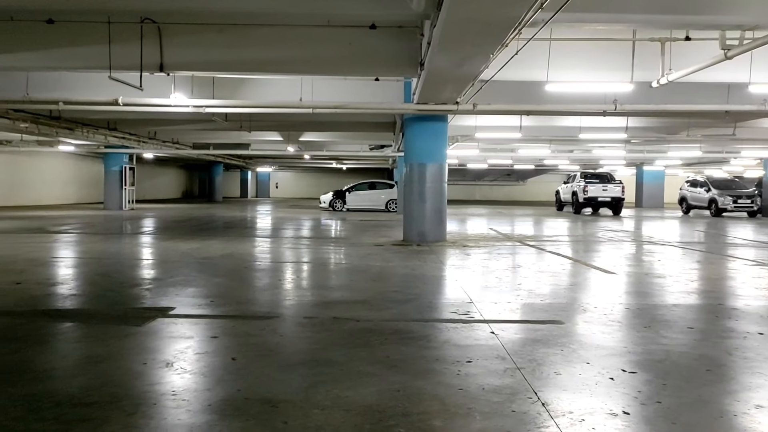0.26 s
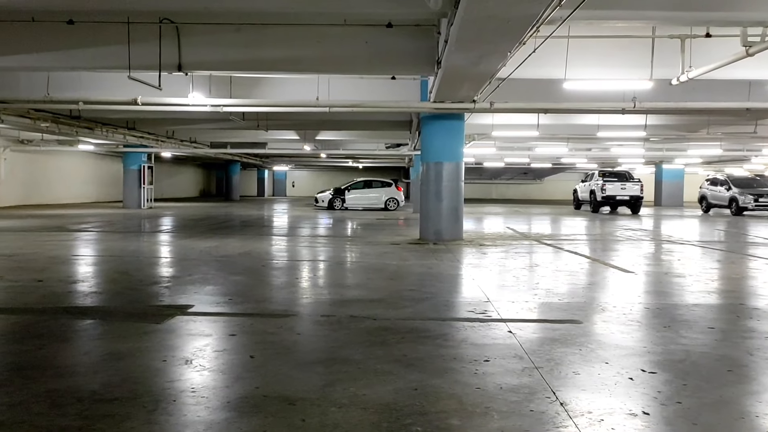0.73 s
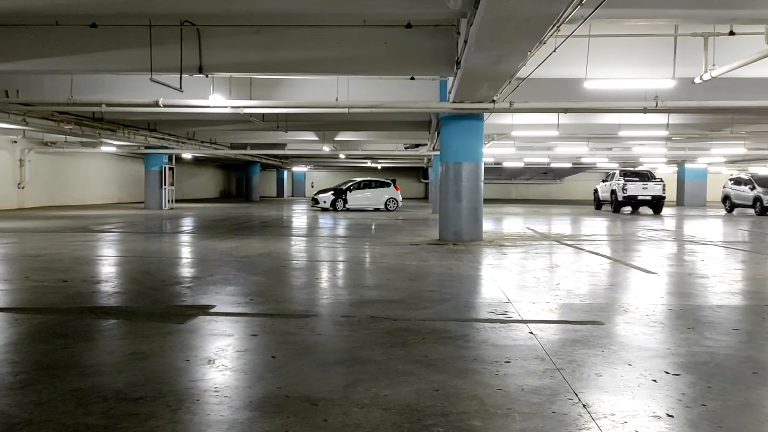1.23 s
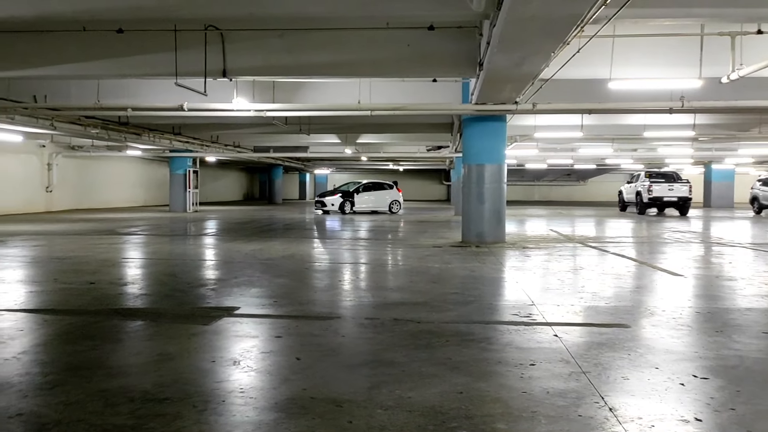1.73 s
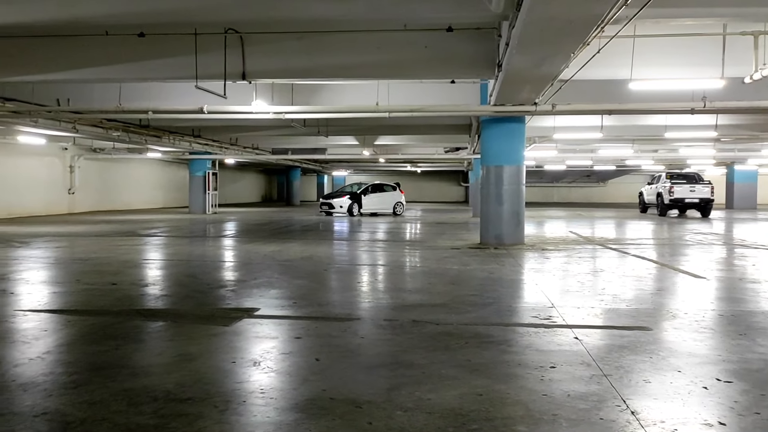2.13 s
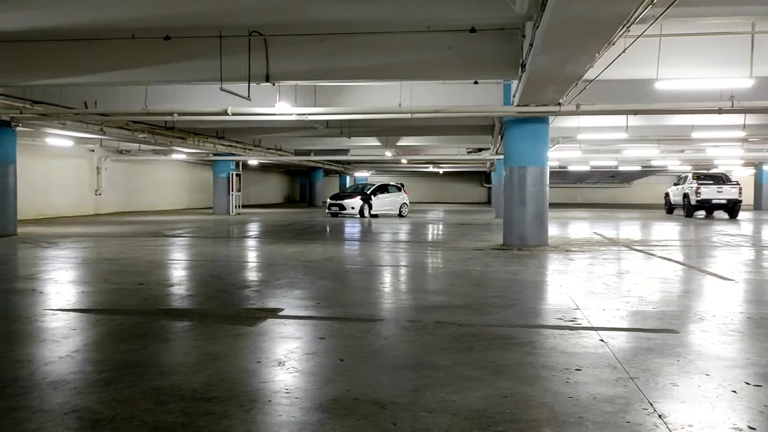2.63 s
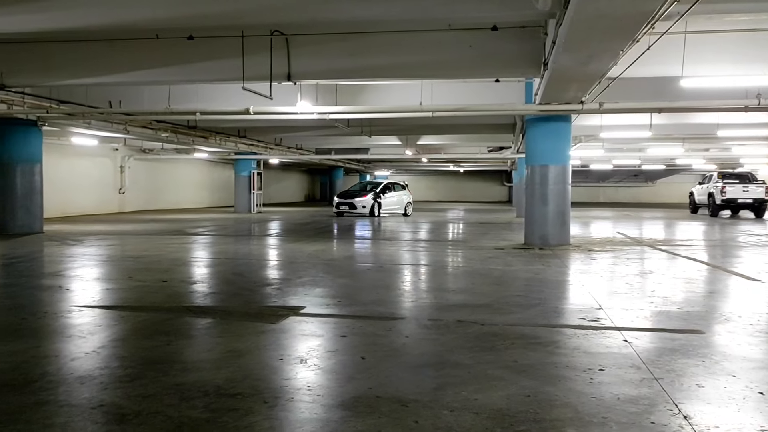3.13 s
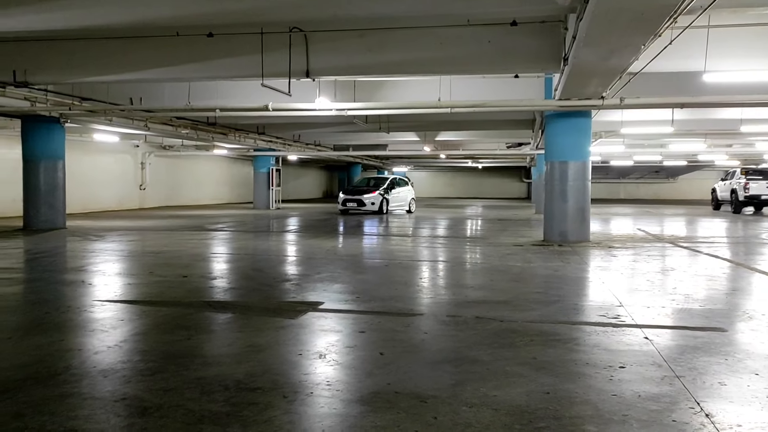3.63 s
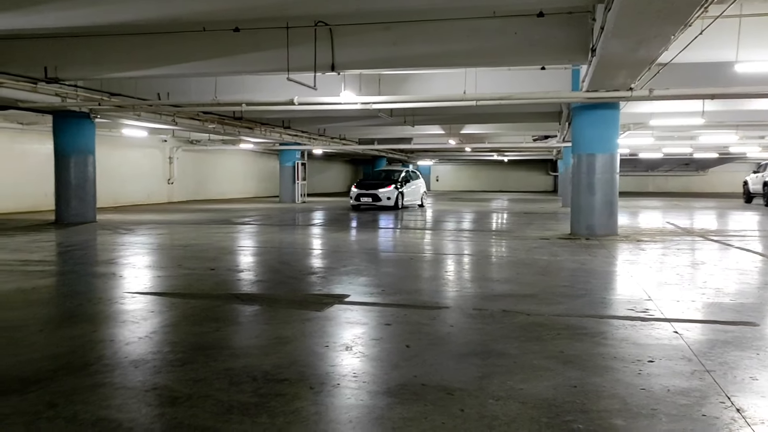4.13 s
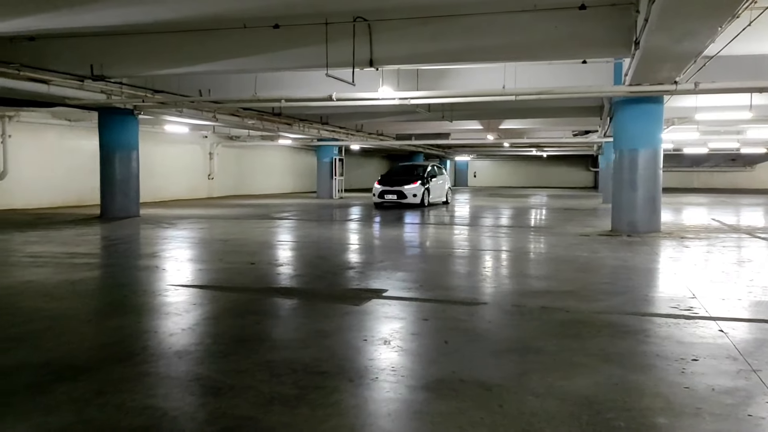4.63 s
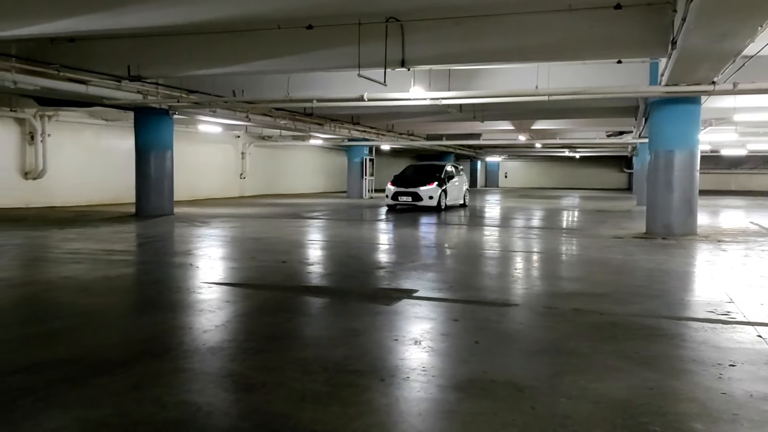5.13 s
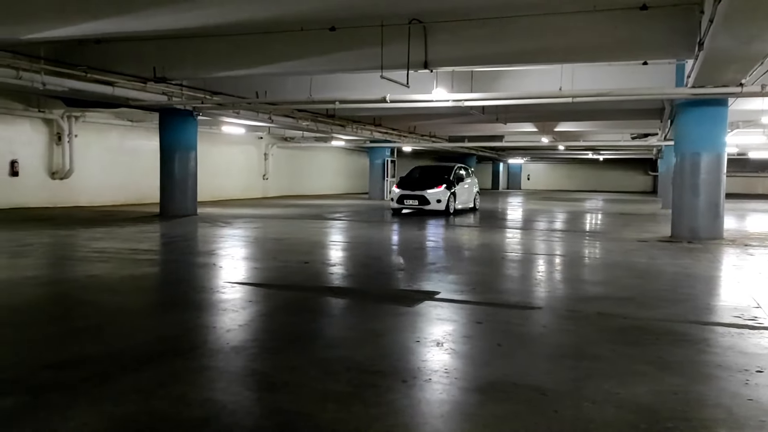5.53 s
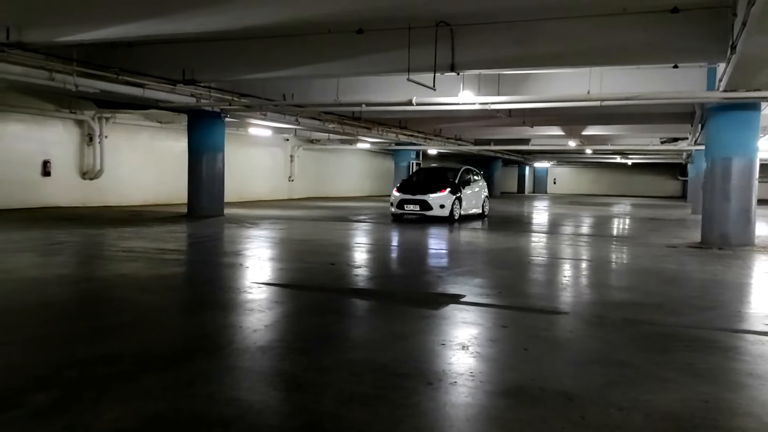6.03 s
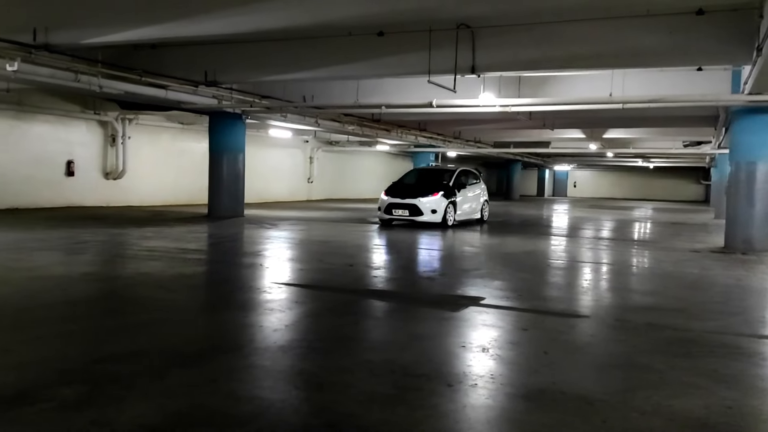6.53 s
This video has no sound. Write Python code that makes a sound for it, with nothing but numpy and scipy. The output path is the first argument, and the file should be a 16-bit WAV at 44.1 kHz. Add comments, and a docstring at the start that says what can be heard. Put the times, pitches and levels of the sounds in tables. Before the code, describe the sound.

A small four-cylinder car moves through a large, low concrete car park, heard from a distance in stereo with diffuse reverberation. From 0 to 2 seconds its engine is a low, smooth drone, rising a little at first and then holding, with booming bass near 85 hertz, uneven exhaust rumble, a brief faint hum and quiet, steady hall air. Around 2.4 seconds the car turns its front to the microphones: a soft, airy engine hiss swells, peaks near 3 seconds and settles slightly higher than before. From about 3.5 seconds the revs climb steadily; roar and rumble thicken. Between 4.5 and 6 seconds deep booms near 155 hertz pulse in and out, with a very faint gear whine. From 6 seconds the low firing throb and rough growl are strongest, and the engine is still running and rising at 6.8 seconds.

```python
"""Small car in a low concrete car park

A four-cylinder car rolls through the hall, turns towards two spaced microphone ports and speeds up.
Its firing orders, sines at multiples of a rising rate, pass through booms that stay near fixed pitches.
Rumble, roar, growl and engine bay hiss are shaped noise; the hiss swells once the bay faces the ports.
A faint gear whine follows the revs, and the air of the hall sounds steadily as diffuse noise."""
import sys
import numpy as np
from scipy import signal
from scipy.fft import rfft, irfft, next_fast_len
from scipy.io import wavfile

SR = 44100
rng = np.random.default_rng(int(sys.argv[2]) if len(sys.argv) > 2 else 0)


def transcribe(u):
    """Save the signal u as a 16-bit wav file named by the first command-line argument.

    u: samples, shape (n,) or (channels, n), limited to [-1, 1]; the rate is SR.
    q: integer samples, one column per channel.
    """
    v = np.clip(np.atleast_2d(u).T, -1, 1)
    q = np.round(v * 32767).astype(np.int16)
    wavfile.write(sys.argv[1], SR, q)


N = 298998
TIME_S = np.arange(N) / SR
GRID = next_fast_len(N + 8192)  # transform length [samples]
HZ = np.maximum(np.arange(GRID // 2 + 1) * SR / GRID, 1)

# Engine speed: (time [s], firing rate [1/s])
FIRING_RATE = [(0, 38.6), (.8, 42.5), (1.5, 43.5), (2.2, 41.9), (2.7, 43.9), (3.5, 45), (4.2, 47.6),
               (4.7, 49), (5.0, 50.3), (5.6, 53.1), (6.25, 56.1), (6.78, 57.6)]
# Firing tone, throbbing as echoes meet it: (time [s], level [dB])
FIRING_LEVEL = [(0, -50), (2, -49.5), (4, -43), (4.3, -35), (4.6, -38), (4.8, -51.5), (5.02, -30.5),
                (5.2, -41.5), (5.45, -30), (5.6, -40.5), (5.8, -29.5), (5.95, -36.5), (6.2, -22.5),
                (6.45, -28), (6.7, -23.5), (6.78, -26)]
# Third order: (time [s], level [dB])
THIRD_LEVEL = [(0, -38), (.8, -29), (1.5, -38.5), (2.2, -47), (2.7, -27), (3.5, -32), (4.2, -33), (5, -34),
               (5.8, -36), (6.3, -29.5), (6.78, -24)]
# Fourth order: (time [s], pitch [Hz], level [dB])
FOURTH_ORDER = [(0, 162, -35.5), (.5, 159.7, -30.5), (.9, 167.6, -24), (1.3, 170, -30.5),
                (1.75, 171.6, -30), (2.15, 169.8, -35.5), (2.5, 171.9, -25.5), (2.9, 175.2, -29),
                (3.4, 178.6, -31), (3.8, 183.7, -30), (4.07, 187, -25), (4.2, 185.9, -31.5),
                (4.33, 184.1, -20), (4.55, 191.2, -33), (4.9, 200.4, -43), (5.4, 209.4, -33),
                (5.8, 225.3, -28), (6.3, 226.1, -34.5), (6.78, 232.4, -29.5)]
# Fifth order, rough and pulled low by echoes as the revs climb: (time [s], pitch [Hz], level [dB])
FIFTH_ORDER = [(0, 195, -32.5), (.8, 207.6, -37), (1.4, 214.5, -28), (2.1, 209.8, -38), (2.7, 216.3, -24.5),
               (3.3, 227.4, -28), (3.6, 224.5, -53), (3.95, 232, -24), (4.25, 235.6, -26),
               (4.5, 238.2, -24.5), (4.9, 247.4, -25), (5.15, 249.5, -27.5), (5.38, 254.2, -23),
               (5.55, 260, -37.5), (6.0, 270.6, -38.5), (6.78, 285.3, -42.5)]
# Other orders ahead of the silencer: (multiple of firing rate [1], relative level [dB])
OTHER_ORDERS = [(.5, -12.5), (2, -11), (2.5, -14.5), (3.5, -13), (4.5, -7), (5.5, -10.5), (6, -3.5),
                (7, -12.5), (8, -10)]
# Silencer response, best below 260 Hz: (frequency [Hz], gain [dB])
SILENCER_GAIN = [(20, -11.5), (100, 7.5), (130, 8), (255, -0.5), (280, -1.5), (345, -12.5), (400, -11),
                 (520, -17.5)]
OTHER_ORDERS_DB = -30  # all of them together

# Booms that stay near their pitch while the revs rise: (time [s], pitch [Hz], level [dB])
LOW_BOOM_TRACK = [(0, 79.2, -36.5), (.17, 85.9, -20), (.4, 86.8, -29.5), (.52, 83.2, -29),
                  (.65, 80.7, -28.5), (.83, 84.25, -25), (1.0, 86.1, -32.5), (1.09, 84.1, -32),
                  (1.22, 83, -24.5), (1.35, 82.24, -31), (1.55, 83.46, -28), (1.95, 82.86, -24),
                  (2.25, 83.5, -20.5), (2.6, 84.4, -19), (2.8, 83.8, -28), (2.95, 84, -32.5),
                  (3.2, 88.53, -28.5), (3.6, 86.1, -26.5), (3.8, 83.1, -30), (4.1, 83.9, -32),
                  (4.25, 85.46, -40), (4.65, 83.2, -20), (4.78, 85, -32), (4.9, 87.97, -46),
                  (5.12, 88.73, -28), (5.6, 87.9, -42), (6.4, 85.04, -33), (6.78, 83.4, -29.5)]
HIGH_BOOM_TRACK = [(3.5, 152, -55), (3.75, 153.1, -40), (3.97, 151.8, -24.5), (4.2, 152, -34),
                   (4.4, 153, -29.5), (4.63, 157, -20.5), (4.85, 153.4, -28), (4.97, 152.3, -19),
                   (5.2, 153.8, -26.5), (5.35, 152.1, -16.5), (5.5, 158.3, -24), (5.58, 159.3, -14.5),
                   (5.68, 157.5, -27.5), (5.82, 150.6, -19.5), (5.95, 154, -28.5), (6.2, 152.8, -19),
                   (6.33, 152.4, -28), (6.57, 153.9, -20), (6.78, 157.4, -19.5)]
# Weaker boom of constant pitch between them: (time [s], level [dB])
MIDDLE_BOOM_LEVEL = [(0, -45), (1.6, -39), (2.3, -53), (3, -40), (3.55, -42), (3.85, -27.5), (4.1, -33.5),
                     (4.6, -47), (4.851, -32), (5.3, -46), (5.8, -36), (6.78, -38)]
MIDDLE_BOOM_HZ = 126.4
# Echoes that wander about the low boom's pitch
FLUTTER_PITCH_HZ, FLUTTER_DB, FLUTTER_WAVER_HZ = 85.43, -37, 16
# A brief hum early on and a late one: (time [s], pitch [Hz], level [dB])
EARLY_HUM_TRACK = [(.15, 318, -55), (.35, 317, -38.5), (.7, 322, -41), (1.1, 316, -43), (1.4, 316, -61.5)]
LATE_HUM_TRACK = [(4.4, 190, -63), (4.7, 190, -27.5), (5.2, 188, -39.5), (5.8, 184, -40), (6.15, 181, -28),
                  (6.5, 183, -30), (6.78, 185, -27.5)]
# Dull throb under the low boom: (time [s], level [dB])
THROB_LEVEL = [(0, -41.5), (1.0, -43), (1.5, -45), (2.0, -46.5), (2.7, -38), (3.2, -47), (3.8, -47),
               (5.1, -43.5), (5.4, -38), (5.8, -40), (6.2, -44), (6.78, -40)]
# Its noise spectrum: (frequency [Hz], relative density [dB per Hz])
THROB_SPECTRUM = [(55, -28), (64, 5.5), (72, 7.5), (78, 0), (88, -35)]

# Gear whine: (time [s], multiple of firing rate [1], level [dB])
WHINE_TRACK = [(4.0, 25.2, -80), (4.3, 25.1, -64), (4.55, 25.2, -63), (4.7, 25.2, -53), (4.8, 25.2, -59),
               (4.93, 25.3, -52), (5.07, 25.1, -52), (5.17, 25, -62), (5.4, 25, -57), (5.52, 24.9, -51),
               (5.66, 25.2, -58), (5.8, 25.3, -55.5), (5.97, 25, -55), (6.07, 25.2, -57),
               (6.22, 25.4, -52.5), (6.35, 25.1, -56), (6.5, 25.0, -55.5), (6.78, 25, -55)]
# A far wall returns the whine late, so a little lower: (delay [s], gain [dB])
WHINE_ECHOES = [(0.17, -12), (0.34, -16)]

# Growl near 460 Hz: (time [s], level [dB])
GROWL_LEVEL = [(0, -71.5), (2.8, -63.5), (3.3, -48.5), (4.1, -50), (4.35, -46), (4.8, -44.5), (5.1, -49),
               (5.6, -48), (5.95, -47.5), (6.15, -39.5), (6.45, -40.5), (6.6, -45.5), (6.78, -43)]
# Body resonance behind the growl: (frequency [Hz], relative density [dB per Hz])
GROWL_SPECTRUM = [(415, -30), (438, -4), (455, 0), (480, 0), (500, -9), (550, -10), (620, -17), (680, -30)]
# Exhaust rumble, growing unevenly as the car nears: (time [s], level [dB])
EXHAUST_LEVEL = [(0, -30), (.9, -25.5), (2.2, -26), (2.7, -24.5), (3.0, -25), (3.3, -23), (4, -21),
                 (4.4, -24.5), (5.3, -23.5), (5.8, -22), (6.78, -21.5)]
# Its spectrum, where the low hall favours some pitches: (frequency [Hz], relative density [dB per Hz])
EXHAUST_SPECTRUM = [(12, -37), (28, -14), (38, -33.5), (55, -12.5), (62, -14.5), (70, -24.5), (80, -21.5),
                    (92, -8), (106, -13), (125, -1), (140, -3), (180, 2), (200, -2.5), (225, -0.5),
                    (255, -3), (275, -11.5), (295, -13.5), (318, -8), (342, -14), (355, -18.5),
                    (410, -21.5), (430, -40), (600, -63)]
# Tyre and intake roar: (time [s], level [dB])
TYRE_INTAKE_LEVEL = [(0, -45), (.4, -43), (2.4, -42.5), (2.9, -41.5), (3.3, -39.5), (4, -39.5), (4.6, -40),
                     (5.7, -39.5), (6.3, -38.5), (6.78, -38)]
# Its spectrum: (frequency [Hz], relative density [dB per Hz])
TYRE_INTAKE_SPECTRUM = [(180, -31.5), (300, -7), (400, -10.5), (425, -11), (500, -12.5), (741, -17.5),
                        (1310, -21), (1850, -25), (2500, -35), (3250, -74.5)]

# The nose swings towards the microphones, overshoots and settles
TURN_S, TURN_LASTS_S, SETTLE_S = 2.445, 0.24, 0.86
# Engine bay hiss: (frequency [Hz], relative density [dB per Hz])
BAY_SPECTRUM = [(800, -26.5), (1100, -4), (1300, 2), (1450, -1), (1650, -13.5), (2200, -5.5), (2700, -3.5),
                (3100, -7), (3620, -8.5), (5710, -11), (7310, -7), (8860, -13), (9500, -12.5),
                (12400, -51.5)]
# Level at the start, growth as the car nears, and full gains for an open and for a squarely facing bay
BAY_START_DB, BAY_RISE_DB_PER_S, BAY_OPEN_DB, BAY_FACING_DB = -53, 0.09, 3.0, 6.5
BAY_FLICKER_DB, BAY_FLICKER_HZ = 0.53, 26.0
# Sheen above the hiss: (frequency [Hz], relative density [dB per Hz])
SHEEN_SPECTRUM = [(9000, -37), (9700, 6.5), (10300, 1.5), (12000, -1), (13000, -3), (15000, -9),
                  (16000, -15.5)]
SHEEN_START_DB, SHEEN_RISE_DB_PER_S, SHEEN_OPEN_DB = -90, 2, 1.5
HISS_EDGE_HZ = 10056

# Steady air of the hall: (frequency [Hz], relative density [dB per Hz])
HALL_SPECTRUM = [(180, -33), (300, -7.5), (327, -3), (347, -10.5), (424, -21), (456, -16.5), (746, -17.5),
                 (913, -14.5), (4350, -34), (7320, -49), (9500, -56), (12400, -74.5), (20900, -120)]
HALL_DB = -46
# Likeness of diffuse noise at the two ports: (frequency [Hz], left-right correlation [1])
PORT_LIKENESS = [(60, 1), (120, 1), (250, 0.87), (520, 0.58), (700, 0.54), (1000, -0.086), (1400, -0.25),
                 (2200, 0.21), (4510, -0.093), (9270, 0.047)]
PORTS_UNLIKE_HZ = 520  # echoes of tones this high reach the ports unrelated
# Colour of the microphone ports: (frequency [Hz], left minus right [dB])
PORT_DIFFERENCE = [(60, 5.5), (180, 6.5), (320, 7), (560, 2.5), (1000, 3.5), (3000, 2.5), (4500, 1),
                   (5800, -1.5), (6900, -6), (7600, -6.5), (8300, 6), (9300, 6.5), (10500, 0.5),
                   (14000, -2.5)]
BASS_LAG_S, MOST_LAG_RAD = 0.00009, 0.2  # delay of the left port and its phase limit
CUTOFF_HZ = 15200


def from_db(db):
    """Decibels are twenty times the decimal logarithm of the amplitude gain."""
    return 10 ** (np.asarray(db) / 20)


def rms_one(x):
    """Division by the root mean square gives unit effective amplitude."""
    return x / np.sqrt(np.mean(x ** 2) + 1e-20)


def in_time(rows):
    """Linear interpolation turns each column into a curve over all samples; end values are held."""
    s, *columns = np.transpose(rows)
    return [np.interp(TIME_S, s, column) for column in columns]


def at_hz(points):
    """Linear interpolation over the logarithm of frequency fills the frequency grid."""
    hz, value = np.transpose(points)
    return np.interp(np.log(HZ), np.log(hz), value)


def drift(rate_hz):
    """Low-pass filtering of white noise by a double pole leaves a slow random curve of rms 1."""
    step = 40  # samples between the drawn values
    pole = np.exp(-2 * np.pi * rate_hz * step / SR)
    white = rng.standard_normal(N // step + 3002)
    slow = signal.lfilter([1], [1, -2 * pole, pole * pole], white)[3000:]  # the filter has settled
    return np.interp(np.arange(N) / step, np.arange(len(slow)), rms_one(slow))


def tone(hz, steady, waver_hz):
    """Direct sound is a steady sine; echoes add random quadrature parts, partly apart at the ports."""
    phase = 2 * np.pi * (np.cumsum(hz) / SR + rng.random())
    cosine, sine = np.cos(phase), np.sin(phase)
    mid = (steady + drift(waver_hz)) * cosine + drift(waver_hz) * sine
    side = drift(waver_hz) * cosine + drift(waver_hz) * sine
    unlike = min(np.mean(hz) / PORTS_UNLIKE_HZ, 1) ** 2
    return rms_one(mid) + unlike * rms_one(side) * [[1], [-1]]


def tracked_tone(rows, steady=8.0, waver_hz=6.0):
    """Modulation: a wavering tone follows tabulated pitch and level."""
    hz, db = in_time(rows)
    return from_db(db) * tone(hz, steady, waver_hz)


def hall_noise(spectrum):
    """A diffuse field is alike at both ports in the bass, almost unrelated in the treble; mid rms 1."""
    mid, side = rfft(rng.standard_normal((2, GRID))) * from_db(at_hz(spectrum))
    alike = np.clip(at_hz(PORT_LIKENESS), -1, 1)
    common = np.sqrt(1 + alike) * mid
    opposed = np.sqrt(1 - alike) * side
    pair = irfft([common + opposed, common - opposed], GRID)[:, :N]
    return pair / np.sqrt(np.mean(pair.mean(axis=0) ** 2))


def levelled_noise(level, spectrum):
    """Modulation: diffuse noise follows a tabulated level."""
    return from_db(in_time(level)[0]) * hall_noise(spectrum)


def engine():
    """Periodic firing radiates whole and half orders; hall echoes make each fade in and out."""
    firing_hz = in_time(FIRING_RATE)[0]
    silencer_hz, silencer_db = np.transpose(SILENCER_GAIN)
    others = 0
    for multiple, db in OTHER_ORDERS:
        order_hz = multiple * firing_hz
        passed_db = db + np.interp(order_hz, silencer_hz, silencer_db)
        others = others + from_db(passed_db) * tone(order_hz, 1.0, 3.0)
    firing = from_db(in_time(FIRING_LEVEL)[0]) * tone(firing_hz, 4.5, 5.0)
    third = from_db(in_time(THIRD_LEVEL)[0]) * tone(3 * firing_hz, 2.0, 4.0)
    fourth = tracked_tone(FOURTH_ORDER, 3.0, 8.3)
    fifth = tracked_tone(FIFTH_ORDER, 2.2, 8.0)
    return firing + third + fourth + fifth + from_db(OTHER_ORDERS_DB) * rms_one(others)


def booms():
    """Resonance holds these tones near their own pitch while the revs rise."""
    middle = tracked_tone([(s, MIDDLE_BOOM_HZ, db) for s, db in MIDDLE_BOOM_LEVEL])
    # no steady part: only wandering echoes
    flutter = from_db(FLUTTER_DB) * tone(np.full(N, FLUTTER_PITCH_HZ), 0, FLUTTER_WAVER_HZ)
    return tracked_tone(LOW_BOOM_TRACK) + tracked_tone(HIGH_BOOM_TRACK) + middle + flutter


def hums():
    """Narrow-band modulation: two passing hums waver in pitch and level."""
    return tracked_tone(EARLY_HUM_TRACK, 1.3, 11.0) + tracked_tone(LATE_HUM_TRACK, 2.0, 6.0)


def gear_whine():
    """A high multiple of the firing rate gives a weak thread of tone, blurred by delayed echoes."""
    multiple, db = in_time(WHINE_TRACK)
    direct = from_db(db) * tone(multiple * in_time(FIRING_RATE)[0], 1.2, 24.0)
    heard = direct
    for delay_s, echo_db in WHINE_ECHOES:
        late = np.pad(direct, [(0, 0), (int(delay_s * SR), 0)])[:, :N]
        heard = heard + from_db(echo_db) * late
    return heard


def throb():
    """Band-limited noise fluctuates slowly, a dull throb under the low boom."""
    return levelled_noise(THROB_LEVEL, THROB_SPECTRUM)


def growl():
    """A body resonance narrows noise; it is strong as the tenth and then the eighth order cross it."""
    return levelled_noise(GROWL_LEVEL, GROWL_SPECTRUM)


def exhaust_rumble():
    """Reverberation spreads the exhaust noise and favours some low pitches."""
    return levelled_noise(EXHAUST_LEVEL, EXHAUST_SPECTRUM)


def tyre_and_intake_roar():
    """Broadband tyre and intake noise is spread by the concrete."""
    return levelled_noise(TYRE_INTAKE_LEVEL, TYRE_INTAKE_SPECTRUM)


def nose():
    """Directivity in time: the bay's opening (0-1), and the passing moment when it faces squarely."""
    since = np.maximum(TIME_S - TURN_S, 0)
    opened = 1 - np.exp(-since / TURN_LASTS_S)
    return opened, opened * np.exp(-(since / SETTLE_S) ** 2)


def engine_bay_hiss():
    """Directivity raises the hiss as the bay turns to the ports; its level flickers slightly."""
    opened, facing = nose()
    db = BAY_START_DB + BAY_RISE_DB_PER_S * TIME_S + BAY_OPEN_DB * opened + BAY_FACING_DB * facing
    return from_db(db + BAY_FLICKER_DB * drift(BAY_FLICKER_HZ)) * hall_noise(BAY_SPECTRUM)


def airy_top():
    """Approach and directivity raise a very faint treble noise above the hiss."""
    db = SHEEN_START_DB + SHEEN_OPEN_DB * nose()[0] + SHEEN_RISE_DB_PER_S * TIME_S
    return from_db(db) * hall_noise(SHEEN_SPECTRUM)


def hall_air():
    """Stationary diffuse noise: the steady air of the hall."""
    return from_db(HALL_DB) * hall_noise(HALL_SPECTRUM)


def scene():
    """Superposition of tones and diffuse noise; all but the sheen falls away steeply near 10 kHz."""
    tones = engine() + booms() + hums() + gear_whine()
    car_noise = throb() + growl() + exhaust_rumble() + tyre_and_intake_roar() + engine_bay_hiss()
    edge = signal.cheby2(10, 40, HISS_EDGE_HZ, fs=SR, output="sos")
    return signal.sosfilt(edge, tones + car_noise + hall_air()) + airy_top()


def record(dry):
    """Spaced ports differ in colour and phase: the left hears the bass a little late; the top is cut."""
    tilt = at_hz(PORT_DIFFERENCE) / 2
    left, right = from_db(tilt), from_db(-tilt)
    even = 2 / (left + right)  # keeps the sum of the two gains constant
    late = np.exp(-1j * np.minimum(2 * np.pi * HZ * BASS_LAG_S, MOST_LAG_RAD))
    ports = even * np.array([left * late, right])
    margin = 2048  # reflected samples that keep the ends smooth
    padded = np.pad(dry, [(0, 0), (margin, margin)], "reflect", reflect_type="odd")
    heard = irfft(rfft(padded, GRID) * ports, GRID)[:, margin:margin + N]
    top_cut = signal.ellip(10, 0.5, 60, CUTOFF_HZ, fs=SR, output="sos")
    return signal.sosfilt(top_cut, heard)


dry = scene()
out = record(dry)
transcribe(out)
```